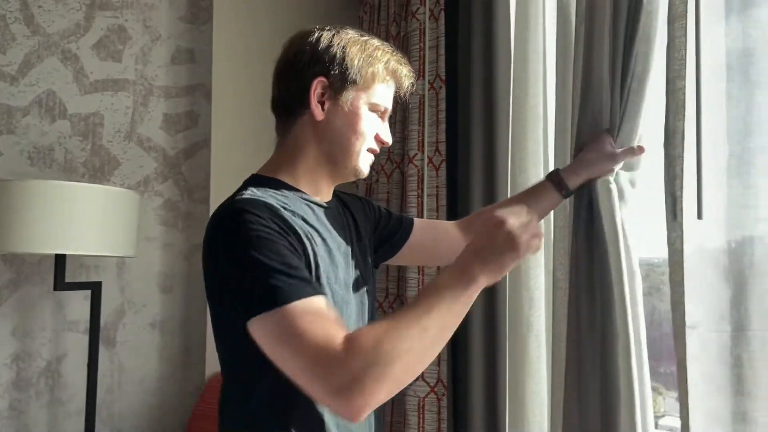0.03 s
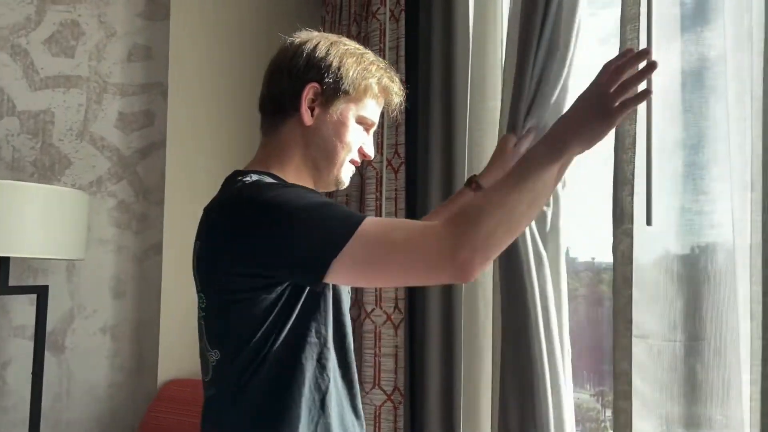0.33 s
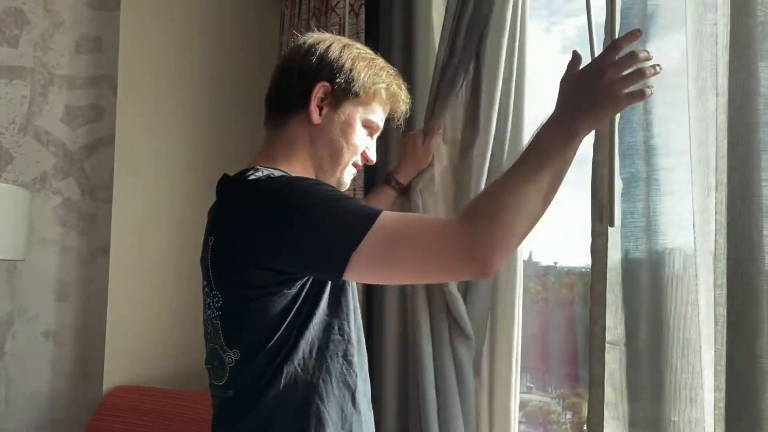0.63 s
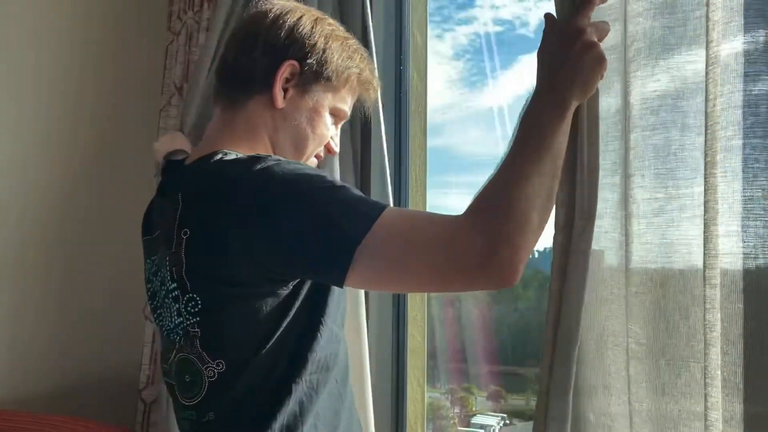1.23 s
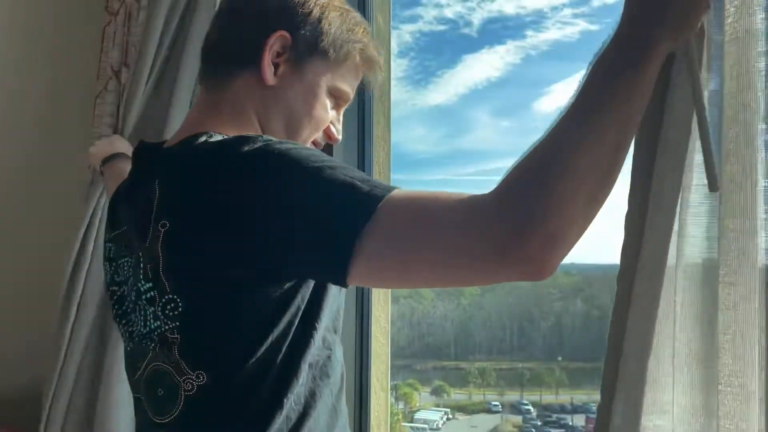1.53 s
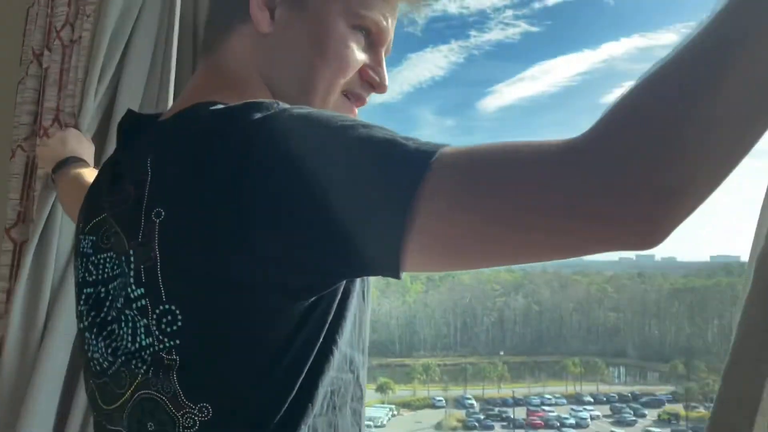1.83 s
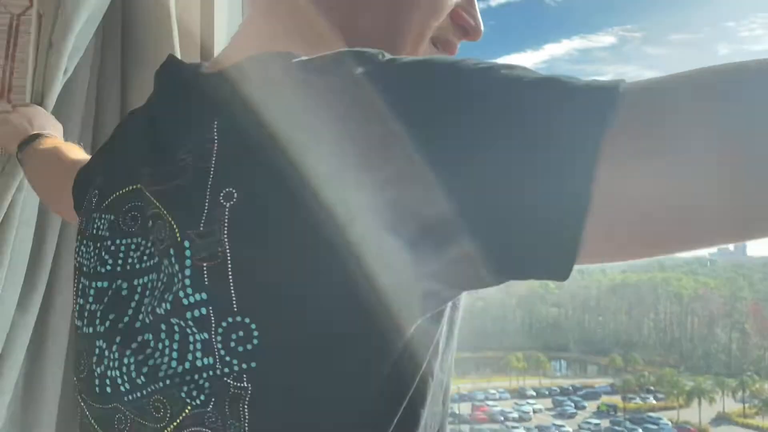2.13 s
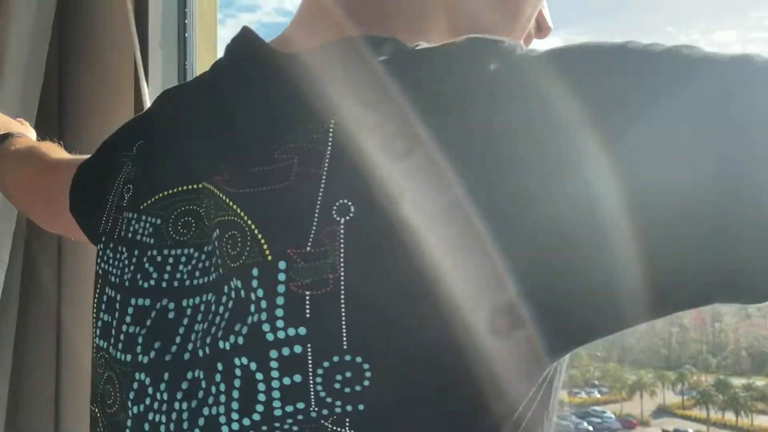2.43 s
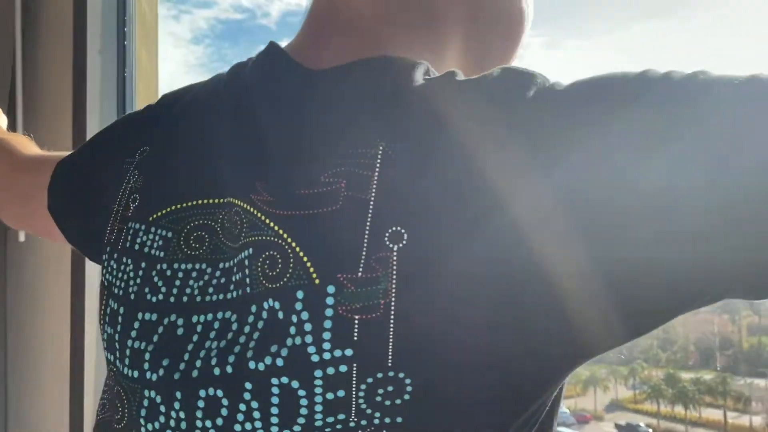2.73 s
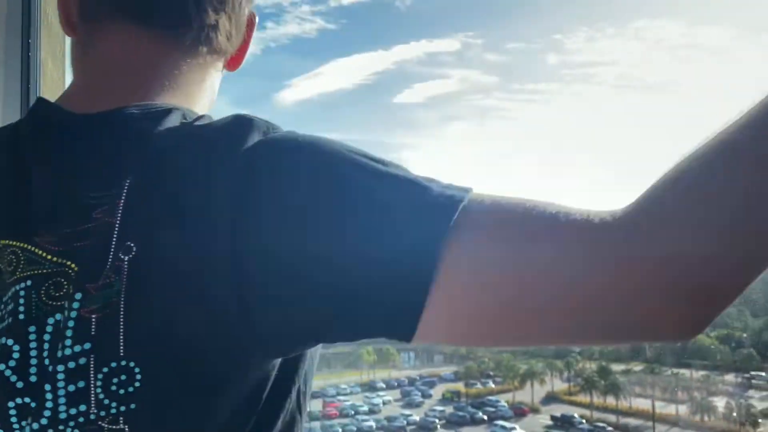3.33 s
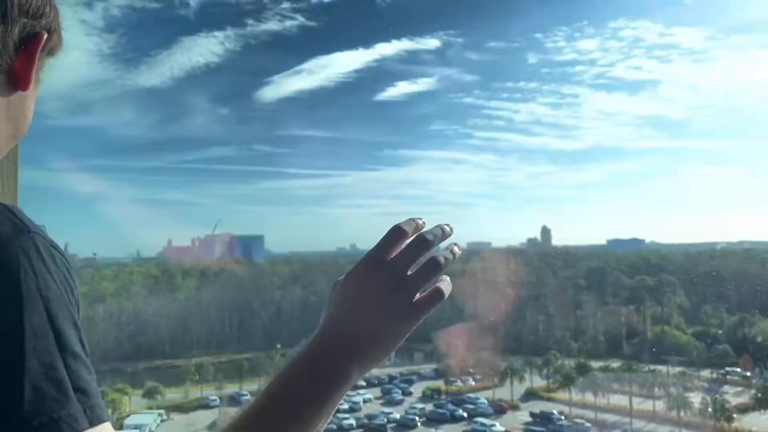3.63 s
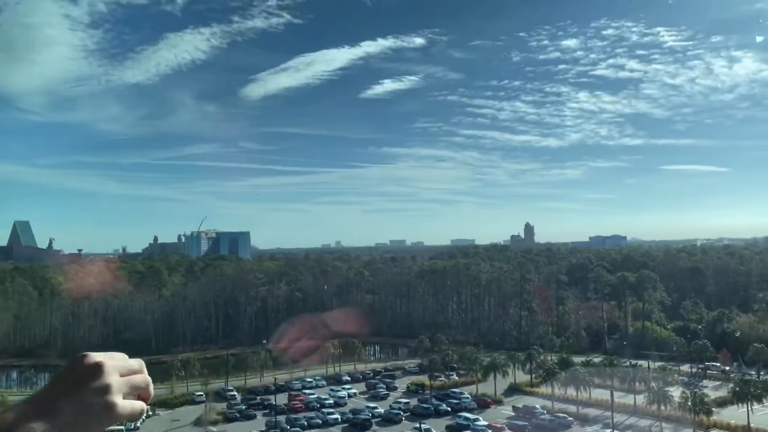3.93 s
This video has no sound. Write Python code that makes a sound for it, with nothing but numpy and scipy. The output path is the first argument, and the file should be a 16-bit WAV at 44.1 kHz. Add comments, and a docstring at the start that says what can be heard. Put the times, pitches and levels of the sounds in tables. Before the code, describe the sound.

Curtains slide along their track in two sweeps, a building pull and then a sharper push that glides to a stop. Plastic gliders chatter and click, with soft hand bumps over the low rumble of a quiet room.

```python
"""First comes the low rumble of a small carpeted room, with a deep thump, a click and a rustle of cloth.
Then curtains are drawn open in two sweeps: a first pull, then a shove that runs into a long glide.
Plastic gliders scrape and chatter in the rail, making it ring, and click as they hit each other.
Faster sliding is louder and brighter. Hands bump softly, and two low hums pass as the curtain slows."""
import sys
import numpy as np
from scipy import signal
from scipy.fft import rfft, irfft, next_fast_len
from scipy.io import wavfile
from scipy.ndimage import uniform_filter1d, map_coordinates

SR = 44100
rng = np.random.default_rng(int(sys.argv[2]) if len(sys.argv) > 2 else 0)


def transcribe(u):
    """Save the signal u as a 16-bit wav file named by the first command-line argument.

    u: samples, shape (n,) or (channels, n), limited to [-1, 1]; the rate is SR.
    q: integer samples, one column per channel.
    """
    v = np.clip(np.atleast_2d(u).T, -1, 1)
    q = np.round(v * 32767).astype(np.int16)
    wavfile.write(sys.argv[1], SR, q)


N = 176400

# base loudness of the room's air and rumble (time [s], level [dB])
AIR_LEVEL = [(0, -69), (.8, -66), (3.0, -66), (4.0, -64.5)]
RUMBLE_LEVEL = [(0, -70), (1.3, -65), (1.45, -73), (1.7, -63.5), (1.9, -65.5), (2.1, -54), (2.35, -71),
                (2.7, -67), (3.0, -63.5), (3.4, -65), (4.0, -59.5)]
# a "colour" says how strong each pitch is in a noise (pitch [Hz], relative level [dB])
AIR_COLOUR = [(50, 2.5), (100, -2.5), (140, 3), (200, -2), (280, -9), (500, -13), (720, -16), (1000, -16.5),
              (2500, -24), (5000, -24.5), (9000, -30.5), (15000, -38)]
RUMBLE_COLOUR = [(30, -58), (55, -7), (76, -1), (88, -6.5), (108, -20.5), (200, -43), (400, -88)]
SWAY_COLOUR = [(1, -40), (3, 0.5), (8, 11), (14, -19), (25, -33), (45, -31.5), (70, -35.5), (120, -67),
               (300, -110)]
# deep thumps (peak time [s], half length [s], level [dB])
THUMPS = [(0.113, 0.041, -51.5), (0.361, 0.026, -48.5), (0.748, .02, -51), (0.869, 0.037, -45.5),
          (1.095, 0.067, -51.5), (1.244, 0.046, -50.5), (1.654, .025, -60), (2.25, .05, -51),
          (2.453, .03, -56), (3.186, .015, -51.5)]

# gliders hitting each other (time [s], snap level [dB], ring level [dB], snap rise [s])
CLICKS = [(0.2158, -52, -49.5, .003), (0.447, -63, -68, .002), (0.475, -55, -70, .001),
          (0.4933, -66, -53, .001), (0.5783, -53, -58, .002), (0.689, -51, -57, .001),
          (0.72, -52, -60, .001), (0.837, -48, -49, .001), (0.896, -66, -51, .001), (1.659, -63, -80, .002),
          (1.682, -57, -72, .001), (1.7283, -59, -60, .0006), (1.813, -37, -52, .0008),
          (1.855, -34, -57, .008), (2.0386, -42, -49, .0015), (2.3008, -50.5, -54, .001),
          (2.47, -48, -55, .001), (2.601, -55, -58, .001), (3.327, -59.5, -62, .001)]
# the tones a struck glider rings with (pitch [Hz], relative level [dB], time to fade 60 dB [s])
GLIDER_TONES = [(2406, 1, 0.065), (2465, -4, 0.05), (2530, -8, 0.11), (2750, -9, 0.03), (3338, -19, .04),
                (5114, -19, 0.05)]
# colours of a click's snap and crack (pitch [Hz], relative level [dB])
SNAP_COLOUR = [(300, -35), (900, -10), (1800, -4.5), (2500, -17), (3600, -4.5), (5200, 1), (6900, -8),
               (8600, -14), (11000, -18), (15700, -32)]
CRACK_COLOUR = [(3000, -26), (5000, 21), (7000, -6), (9000, 4), (14000, 0), (15700, -28)]

# swishes of cloth (peak time [s], half length [s], level [dB])
SWISHES = [(0.306, 0.054, -69.5), (1.555, 0.15, -69.5), (1.67, 0.046, -80), (3.842, 0.084, -78)]
# soft bumps (time [s], thud level [dB], knock level [dB], rise [s], time to fade 60 dB [s])
BUMPS = [(0.291, -64.5, -71.5, 0.019, 0.41), (0.3482, -54.5, -63.5, 0.0006, 0.047),
         (0.364, -58, -71, 0.0011, 0.043), (1.545, -57, -66, 0.003, 0.091),
         (1.596, -59, -77, 0.0052, 0.086), (1.922, -49, -63, 0.0024, 0.053),
         (2.433, -48, -43.5, 0.0028, 0.11), (3.275, -66, -67, 0.01, 0.23),
         (3.5458, -54.5, -56, .0005, 0.065), (3.779, -58, -66, 0.0022, 0.09)]
# colours of the cloth and the bumps (pitch [Hz], relative level [dB])
CLOTH_COLOUR = [(300, 6.5), (1200, 2), (2500, -4), (5000, -0.5), (9000, -10.5), (15000, -33)]
THUD_COLOUR = [(100, -17), (220, -4.5), (400, -0.5), (600, -7), (1000, -12.5), (3000, -58)]
KNOCK_COLOUR = [(300, -20), (800, -9), (1250, 8.5), (1800, -3.5), (2600, -4), (3200, -17), (4500, -22),
                (10000, -42)]

# base loudness of each stroke, which follows its speed (time [s], level [dB])
PULL_LEVEL = [(0.42, -80), (0.45, -67), (0.498, -62.5), (0.512, -62.5), (0.65, -53.5), (1.02, -50.5),
              (1.3, -43.5), (1.382, -46.5), (1.472, -56.5), (1.652, -75), (1.66, -65.5)]
SHOVE_LEVEL = [(1.68, -84), (1.76, -61), (1.84, -47.5), (1.87, -41), (1.93, -42), (2.05, -45.5),
               (2.15, -54.5), (2.3, -80), (2.45, -83)]
GLIDE_LEVEL = [(2.08, -59), (2.2, -56), (2.32, -54.5), (2.41, -49), (2.58, -49.5), (2.71, -53),
               (2.85, -61.5), (2.92, -60.5), (2.99, -58), (3.05, -65), (3.1, -77), (3.14, -68.5),
               (3.19, -77), (3.3, -82)]
# colour of the rail in each stroke (pitch [Hz], relative level [dB])
PULL_COLOUR = [(150, -9.5), (550, -22), (850, -12), (1080, -12), (1500, -8.5), (1750, -11), (2050, -5),
               (2350, 2.5), (3200, -3), (3950, -3.5), (5000, -1), (5900, -4), (6600, -12.5), (7900, -11.5),
               (8700, -8), (9700, -14), (13000, -18.5), (15700, -26)]
SHOVE_COLOUR = [(150, -14), (550, -24), (1050, -20), (1550, -7), (1950, -9), (2300, -1.5), (2900, 0.5),
                (3400, -6), (4600, -4.5), (5800, -5.5), (6800, -13), (8700, -16), (10500, -22),
                (15700, -33)]
GLIDE_COLOUR = [(150, -20.5), (400, -16), (570, -25), (720, -13), (900, -11), (1300, -8.5), (1950, -10.5),
                (2400, -5.5), (3000, -2), (3600, -8.5), (4400, -4), (5200, 0), (6100, -1.5), (6800, -12),
                (8700, -14.5), (10500, -21), (15700, -34)]
# where the rail rings in each stroke (pitch at the stroke's peak [Hz], width [Hz],
# relative level [dB], growth [dB per dB of speed], pitch drift [Hz/s])
PULL_RINGS = [(3206, 440, -2.5, 0.5, 749), (8630, 560, -15, 2, 730)]
SHOVE_RINGS = [(2260, 70, -14, .1, 0), (2500, 60, -13, .1, 0)]
GLIDE_RINGS = [(2410, 200, -10.5, 0, 0.015), (5260, 150, -6.5, 0.56, 0)]
# the rail's two tones in each sweep (time [s], pitch [Hz], level [dB])
FIRST_LOW_TONE = [(.58, 700, -81), (.8, 705, -71), (1.17, 705, -69.5), (1.25, 705, -60), (1.315, 705, -59),
                  (1.35, 705, -71), (1.45, 705, -80)]
FIRST_HIGH_TONE = [(.5, 1290, -82), (.85, 1295, -68.5), (.97, 1305, -63), (1.05, 1305, -65),
                   (1.2, 1335, -61), (1.32, 1315, -61.5), (1.4, 1315, -78)]
SECOND_LOW_TONE = [(1.76, 705, -82), (1.82, 705, -72), (2.05, 685, -72), (2.3, 700, -78), (2.5, 706, -66.5),
                   (2.64, 689, -67.5), (2.8, 691, -87)]
SECOND_HIGH_TONE = [(1.73, 1255, -88), (1.79, 1232, -66), (1.94, 1230, -67), (2.01, 1220, -62),
                    (2.2, 1217, -68), (2.33, 1225, -68.5), (2.6, 1230, -77)]
# colours of the fine rattle, the short scrape and the ticks (pitch [Hz], relative level [dB])
RATTLE_COLOUR = [(2000, -21), (6500, -13), (8700, 4), (13000, -7), (15700, -11)]
SCRAPE_COLOUR = [(1500, -30), (3000, -4), (3900, 2), (5500, -4), (7000, -29), (15000, -50)]
TICK_COLOUR = [(1000, -32), (2500, -14), (4200, -14), (4900, -3), (5250, 3), (5600, -4), (6000, -3),
               (6700, -17), (8700, -19), (11000, -30), (15700, -42)]

# low hums as the curtain slows (peak time [s], half length [s], pitch [Hz], level [dB])
HUMS = [(2.86, 0.06, 298.7, -70), (3.01, .06, 140, -57)]
# how long the room's echo lasts (pitch [Hz], time to fade 60 dB [s])
ECHO_FADE = [(200, 0.69), (2500, 0.44), (12000, 0.089)]

HARD_CLICK_DB, CRACK_DB = -39, -9  # snap level that cracks fully; a full crack's level against its snap
FULL_SPEED_DB, TREBLE_HZ = -45, 3100  # stroke level that counts as full speed; where the treble starts
ECHO_DB, TOP_HZ = -11.5, 15750


def amp(db):
    """Turn decibels into a number to multiply by."""
    return 10 ** (np.asarray(db) / 20)


def unit(x):
    """Scale a sound to an average strength (rms) of 1."""
    return x / np.sqrt(np.mean(x ** 2) + 1e-20)


def clock():
    """The time of each sample, in seconds."""
    return np.arange(N) / SR


def at_pitch(points, hz):
    """Look up a pitch between a table's (pitch, value) points, on a log scale."""
    pitches, values = np.transpose(points)
    return np.interp(np.log(hz + 1), np.log(pitches + 1), values)


def level(rows):
    """Join (time, level) points into a dB curve that drops 100 dB a second beyond its ends."""
    times, db = np.transpose(rows)
    outside_s = np.abs(clock() - np.clip(clock(), times[0], times[-1]))
    return np.interp(clock(), times, db) - 100 * outside_s


def wobble(per_s):
    """A smooth curve through per_s random values a second."""
    return map_coordinates(rng.standard_normal(1024), [clock() * per_s], mode="wrap")


def filtered(x, response):
    """Turn each pitch in x up or down by response(pitch)."""
    size = next_fast_len(N + SR // 2)
    return irfft(rfft(x, size) * response(np.fft.rfftfreq(size, 1 / SR)), size)[:N]


def coloured(x, colour):
    """Give x a colour, with any ringing coming after each jolt and never before it."""
    size = 4096
    cepstrum = irfft(np.log(amp(at_pitch(colour, np.fft.rfftfreq(size, 1 / SR)))))
    cepstrum[1:size // 2] *= 2  # fold the "before" half onto the "after" half
    cepstrum[size // 2 + 1:] = 0
    return signal.fftconvolve(x, irfft(np.exp(rfft(cepstrum))))[:N]


def noise(colour):
    """Noise with the given colour, at strength 1."""
    return unit(filtered(rng.standard_normal(N), lambda hz: amp(at_pitch(colour, hz))))


def steadied(x, window_s):
    """Even out the slow swells of a noise, at strength 1."""
    power = np.abs(uniform_filter1d(x ** 2, int(SR * window_s)))
    return unit(x / np.sqrt(power + 0.25))


def hit(start_s, rise_s, fade_s):
    """The loudness shape of a hit: it rises, then falls 60 dB every fade_s."""
    t = np.maximum(clock() - start_s, 0)
    return (1 - np.exp(-t / rise_s)) * amp(-60 * t / fade_s)


def swell(peak_s, half_s):
    """A bell-shaped rise and fall in loudness."""
    return np.exp(-((clock() - peak_s) / half_s) ** 2)


def jolts(per_s, spread_db=1.5):
    """Tiny kicks of uneven size at random times."""
    sizes = amp(spread_db * np.minimum(rng.exponential(size=N), 3))
    return unit((rng.random(N) < per_s / SR) * sizes * rng.choice([-1, 1], N))


def friction():
    """Smooth scraping mixed with the chatter of tiny jolts."""
    return unit(rng.standard_normal(N) + amp(-3) * jolts(per_s=700))


def ringing(pitch_hz, width_hz):
    """Something rubbed rings: a narrow band of noise around a moving pitch."""
    phase = 2 * np.pi * np.cumsum(pitch_hz) / SR
    a, b = (unit(filtered(rng.standard_normal(N), lambda hz: 1 / (1 + (hz / width_hz) ** 2)))
            for _ in range(2))
    return a * np.cos(phase) + b * np.sin(phase)


def room_background():
    """An uneven low rumble, a sway of air mostly too deep to hear, and the room's soft hush."""
    rumble = amp(level(RUMBLE_LEVEL) + 2) * steadied(noise(RUMBLE_COLOUR), window_s=0.23)
    sway = amp(-29) * steadied(noise(SWAY_COLOUR), window_s=0.32)
    air = amp(level(AIR_LEVEL)) * noise(AIR_COLOUR)
    return rumble + sway + air


def deep_thumps(pitch_hz=77):
    """Each soft thump is a few wavering cycles of the room's lowest boom."""
    out = np.zeros(N)
    for peak_s, half_s, db in THUMPS:
        phase = 2 * np.pi * (pitch_hz * clock() + rng.random()) + wobble(34.92)
        out += amp(db) * np.sqrt(2) * swell(peak_s, half_s) * np.sin(phase)
    return out


def glider_clicks():
    """Gliders collide with a short snap and a brief ring; the hardest hits add a bright crack."""
    snap, crack, out = noise(SNAP_COLOUR), noise(CRACK_COLOUR), np.zeros(N)
    t = np.arange(SR // 5) / SR
    for start_s, snap_db, ring_db, rise_s in CLICKS:
        out += amp(snap_db) * snap * hit(start_s, rise_s, fade_s=0.04)
        crack_db = snap_db + CRACK_DB + 2 * min(snap_db - HARD_CLICK_DB, 0)
        out += amp(crack_db) * crack * hit(start_s, rise_s, fade_s=0.03)
        ring = np.zeros(len(t))
        for hz, db, fade_s in GLIDER_TONES:  # a little different on every hit
            fade = amp(db + rng.normal(0, 1.5) - 60 * t / fade_s)
            ring += fade * np.sin(2 * np.pi * hz * rng.normal(1, 0.003) * t)
        out[round(start_s * SR):][:len(t)] += amp(ring_db) * ring * (1 - np.exp(-t / 0.00095))
    return out


def cloth_rustle():
    """Folds brush past each other in soft, fluttering swishes."""
    swishes = sum(amp(db) * swell(peak_s, half_s) for peak_s, half_s, db in SWISHES)
    return noise(CLOTH_COLOUR) * amp(2.8 * wobble(98)) * swishes


def hand_bumps():
    """Hands and cloth bump without ringing: a low thud plus a drier knock."""
    thud, knock = noise(THUD_COLOUR), noise(KNOCK_COLOUR)
    return sum((amp(thud_db) * thud + amp(knock_db) * knock) * hit(start_s, rise_s, fade_s)
               for start_s, thud_db, knock_db, rise_s, fade_s in BUMPS)


def glider_slide(stroke, colour, rings, brighten, uneven_db, gain_db):
    """Gliders scrape along the rail and set it ringing; faster is louder and brighter."""
    db = level(stroke)
    speed_db = np.maximum(db - FULL_SPEED_DB, -12)
    since_peak_s = clock() - np.argmax(db) / SR
    rail = unit(coloured(friction(), colour))
    treble = filtered(rail, lambda hz: hz ** 4 / (hz ** 4 + TREBLE_HZ ** 4))
    rail += treble * (amp(brighten * speed_db) - 1)
    for hz, width_hz, ring_db, growth, drift in rings:
        rail += amp(ring_db + growth * speed_db) * ringing(hz + drift * since_peak_s, width_hz)
    return amp(db + gain_db + uneven_db * wobble(70)) * rail


def glider_ticks(stroke, colour, per_s, gain_db):
    """Single gliders tick against the rail in a bright patter, louder when the stroke is faster."""
    return amp(level(stroke) + gain_db) * unit(coloured(jolts(per_s), colour))


def rail_tones():
    """The rail sings in two slightly grainy tones whose pitch shifts as the gliders travel."""
    out = np.zeros(N)
    for curve, width_hz in ((FIRST_LOW_TONE, 23), (FIRST_HIGH_TONE, 28),
                            (SECOND_LOW_TONE, 45), (SECOND_HIGH_TONE, 28)):
        times, hz, db = np.transpose(curve)
        tone = steadied(ringing(np.interp(clock(), times, hz), width_hz), window_s=0.061)
        out += amp(level(np.transpose([times, db]))) * tone
    return out


def short_scrape():
    """The curtain scrapes once as the first pull ends."""
    return amp(-57.5) * swell(peak_s=1.535, half_s=0.014) * unit(coloured(friction(), SCRAPE_COLOUR))


def low_hums():
    """Two faint low tones swell and fade as the curtain slows."""
    out = np.zeros(N)
    for peak_s, half_s, hz, db in HUMS:
        phase = 2 * np.pi * hz * clock() + 0.25 * wobble(25.16)
        out += amp(db) * np.sqrt(2) * swell(peak_s, half_s) * np.sin(phase)
    return out


def room_echo(x):
    """Sound bounces briefly around the furnished room; high pitches die away first."""
    hz, t, spectrum = signal.stft(rng.standard_normal(SR // 2), SR, nperseg=256)
    fade = amp(-60 * t / at_pitch(ECHO_FADE, hz)[:, None])
    tail = signal.istft(spectrum * fade, SR, nperseg=256)[1]
    delayed_tail = np.pad(tail / np.linalg.norm(tail), (SR // 300, 0))
    return signal.fftconvolve(x, delayed_tail)[:N]


def scene():
    """Add up the three strokes, their small noises, their echo and the room's own low sounds."""
    curtain = (
        glider_slide(PULL_LEVEL, PULL_COLOUR, PULL_RINGS, brighten=0.25, uneven_db=1.3, gain_db=0)
        + glider_slide(SHOVE_LEVEL, SHOVE_COLOUR, SHOVE_RINGS,
                       brighten=0.097, uneven_db=-0.3, gain_db=-1.5)
        + glider_slide(GLIDE_LEVEL, GLIDE_COLOUR, GLIDE_RINGS, brighten=0.11, uneven_db=1, gain_db=1)
        + rail_tones()
        + glider_ticks(GLIDE_LEVEL, TICK_COLOUR, per_s=170, gain_db=-8)
        + glider_ticks(PULL_LEVEL, RATTLE_COLOUR, per_s=140, gain_db=-19)
        + glider_clicks() + hand_bumps() + cloth_rustle() + short_scrape() + low_hums())
    return (curtain + amp(ECHO_DB) * room_echo(curtain) + deep_thumps() + room_background())[None]


def record(dry):
    """Cut away every pitch above TOP_HZ."""
    return filtered(dry[0], lambda hz: hz < TOP_HZ)[None]


dry = scene()
out = record(dry)
transcribe(out)
```